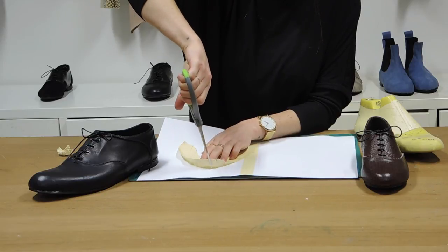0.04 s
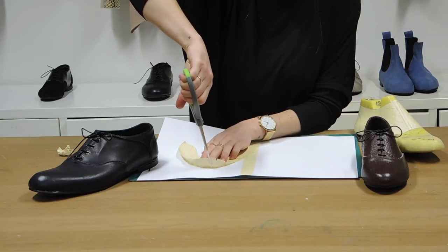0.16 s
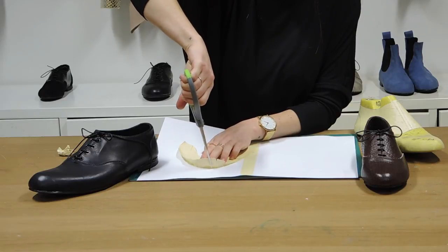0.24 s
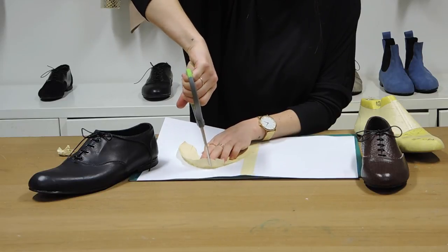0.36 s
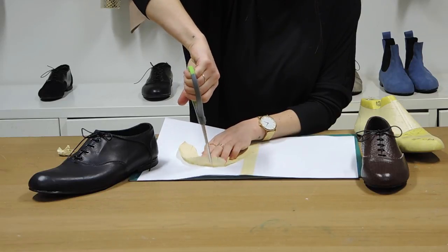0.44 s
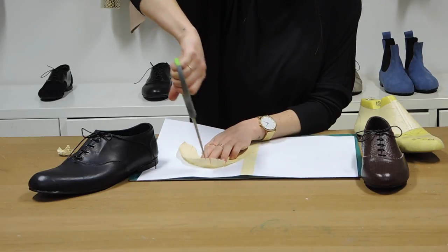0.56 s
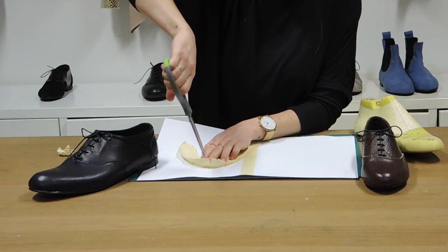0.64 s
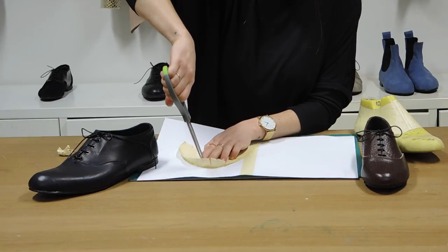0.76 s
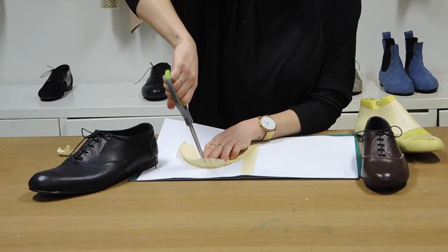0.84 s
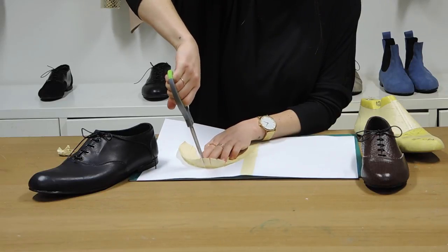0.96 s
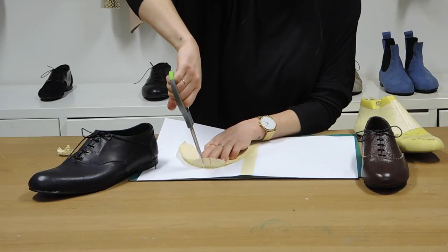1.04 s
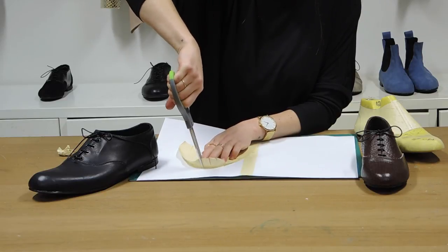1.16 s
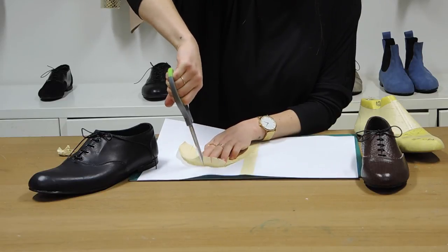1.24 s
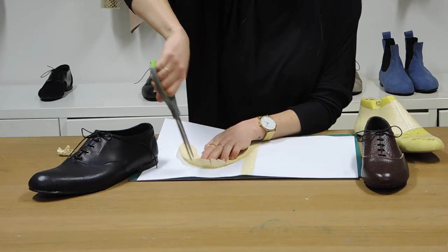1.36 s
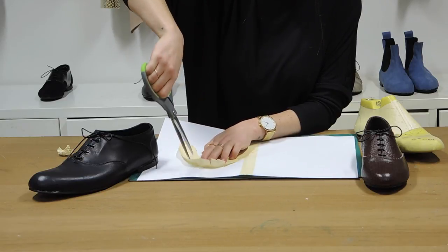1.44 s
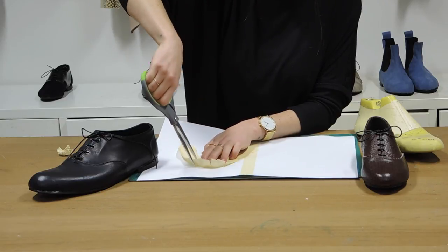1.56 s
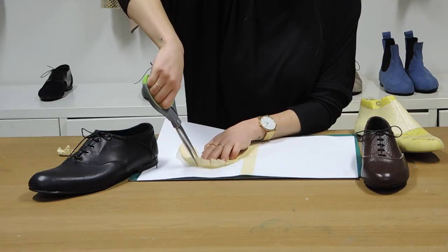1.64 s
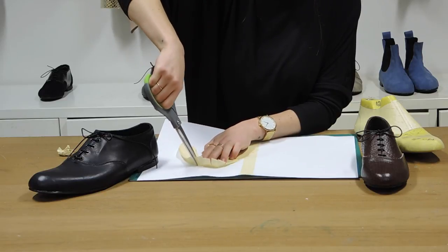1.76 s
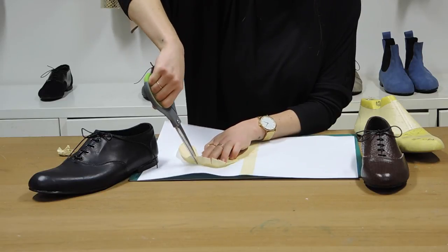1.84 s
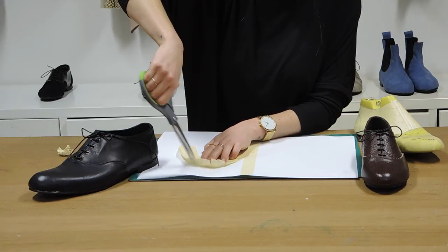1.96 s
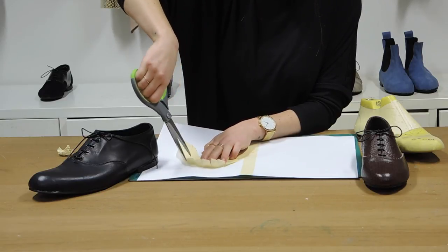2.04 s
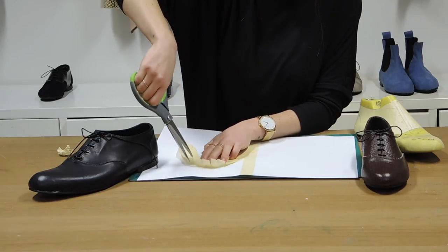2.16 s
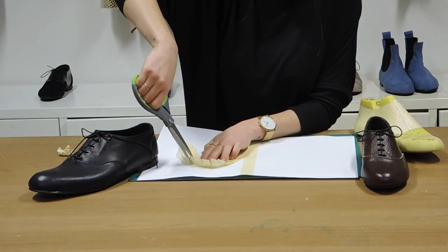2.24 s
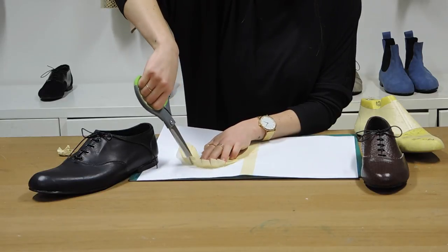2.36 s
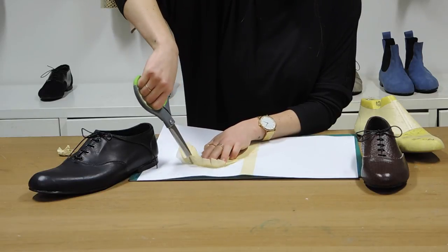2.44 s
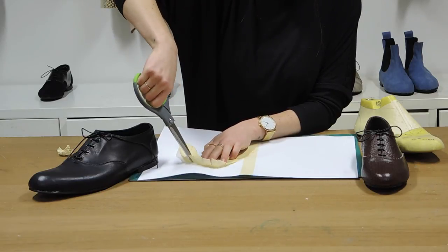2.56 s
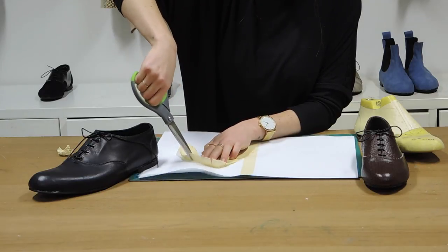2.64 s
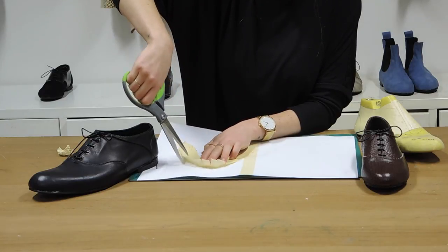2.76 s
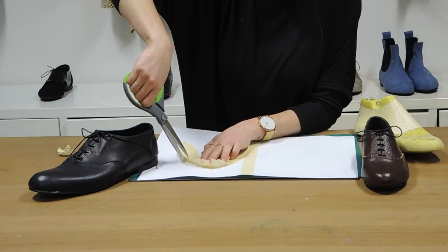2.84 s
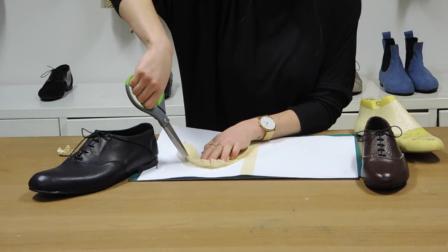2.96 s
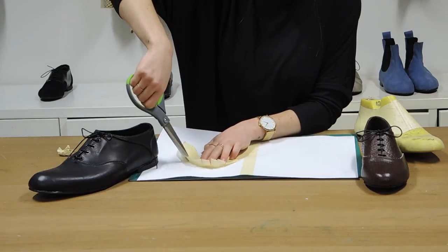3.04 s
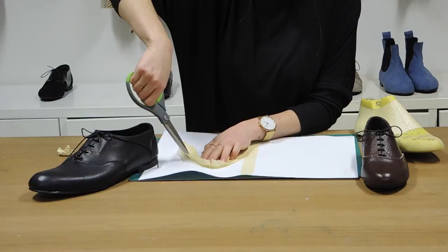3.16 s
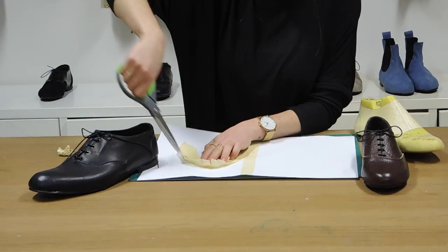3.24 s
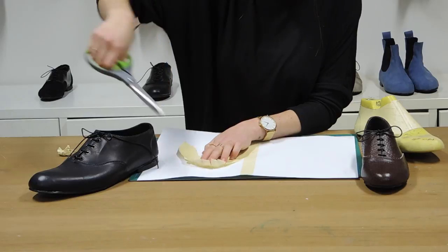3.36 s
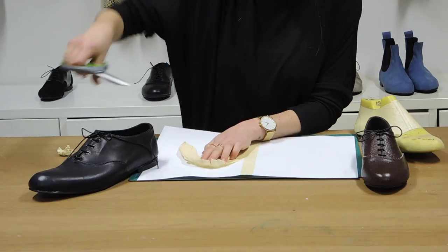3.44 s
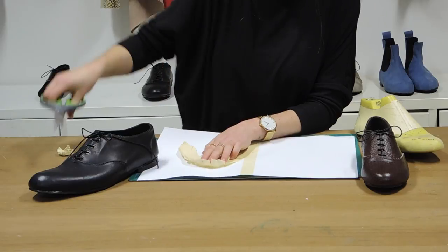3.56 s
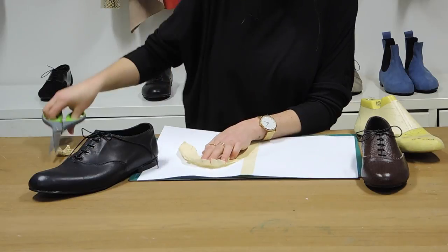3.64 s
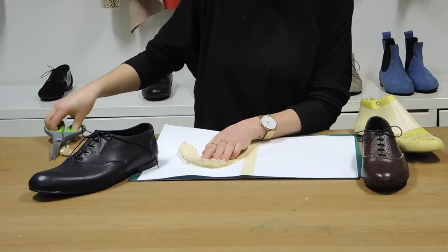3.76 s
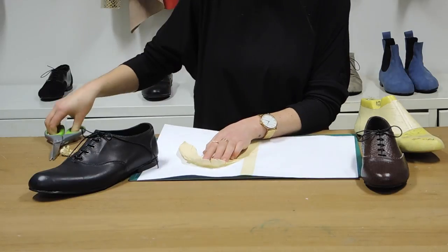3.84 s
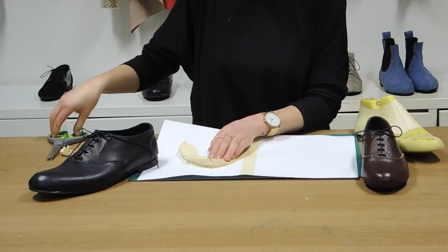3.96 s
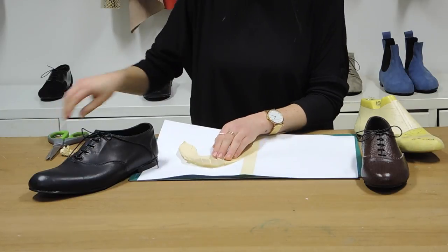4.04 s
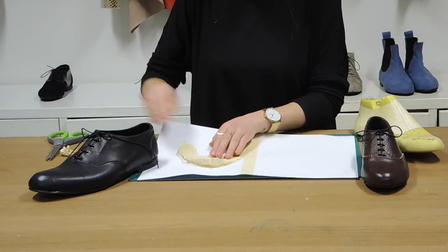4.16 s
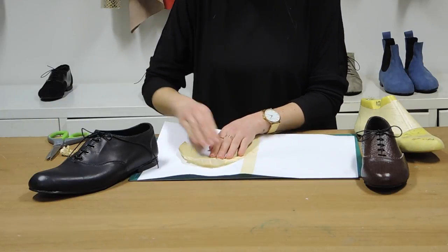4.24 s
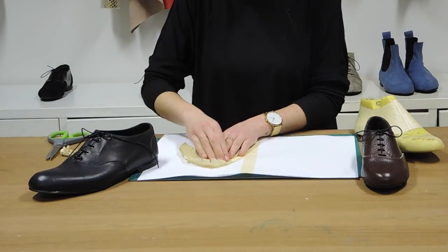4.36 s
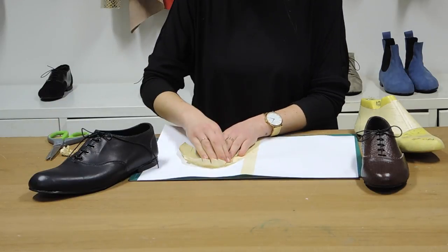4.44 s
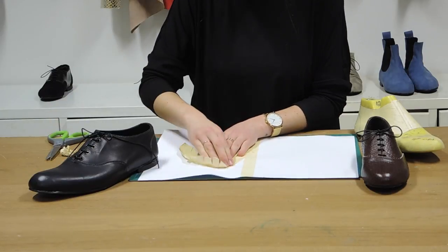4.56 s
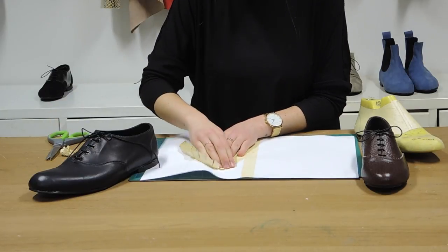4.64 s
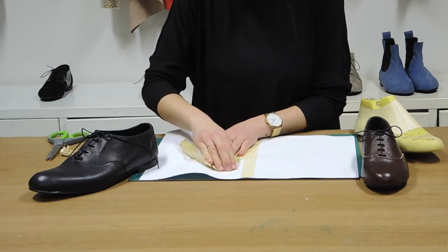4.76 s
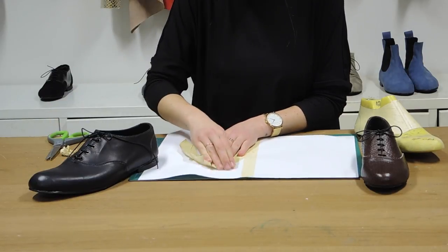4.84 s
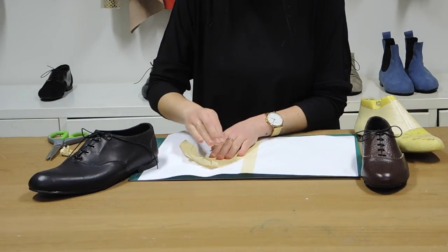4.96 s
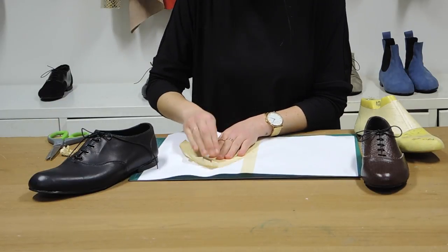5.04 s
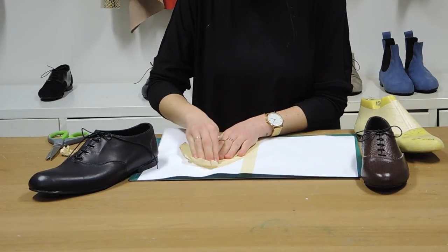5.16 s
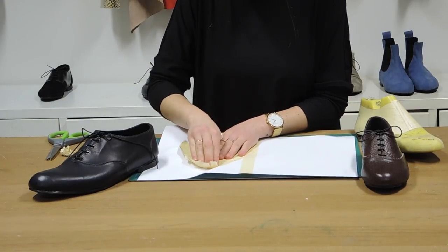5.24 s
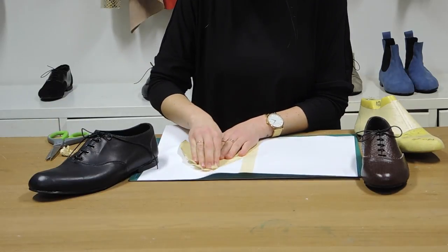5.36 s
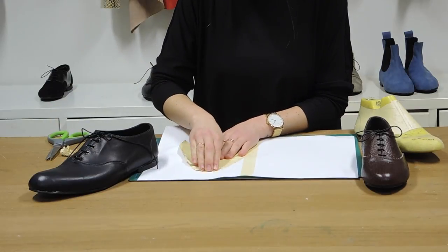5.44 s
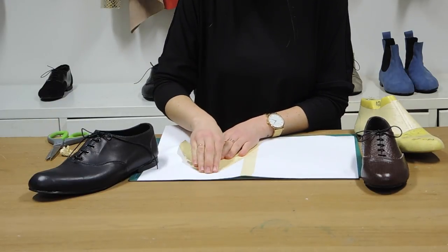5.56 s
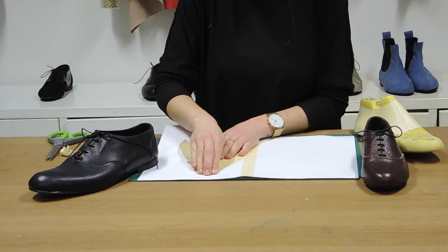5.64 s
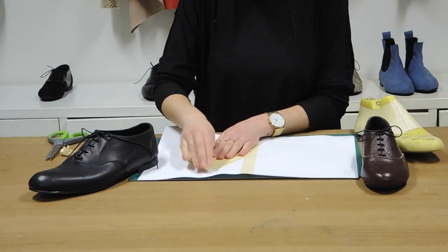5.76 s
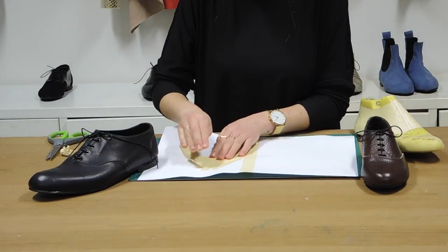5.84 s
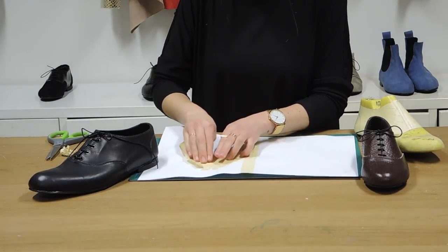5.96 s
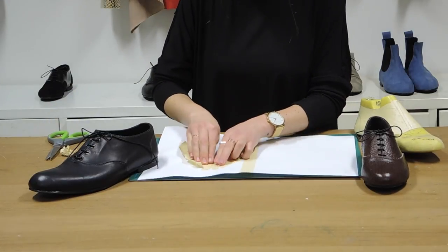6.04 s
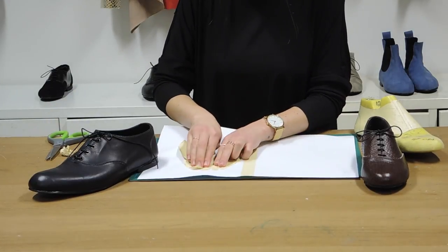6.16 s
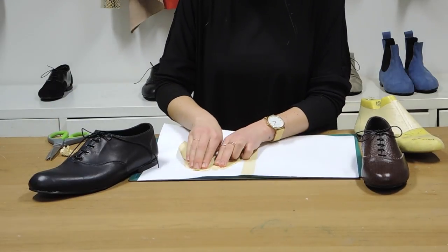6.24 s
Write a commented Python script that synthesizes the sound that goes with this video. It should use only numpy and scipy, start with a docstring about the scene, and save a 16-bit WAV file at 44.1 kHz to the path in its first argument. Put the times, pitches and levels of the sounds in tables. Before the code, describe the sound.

Scissors make about four short, crisp snips through masking tape on paper, each a thin metallic bite followed by the click of the handles. The paper scuffs and snaps in between. The scissors are then put down on a wooden table with a clack and a brief low ring. Fingers press and rub the tape, with one sharp paper snap. The room is bare and echoing, and the sound sits on the right over faint hiss.

```python
"""Masking tape on paper on a wooden table in a bare, echoing room.
The paper scuffs and snaps; scissors snip the tape: the blades bite, then shut. A far bump at 2.2 s.
Near 4 s the scissors are laid down with a clack, and two low tones linger.
Fingers then press and rub the tape, making the paper snap and the table hum.
One microphone feeds the right channel; the left has amplifier hiss, hum and a trace of leaked treble."""
import sys
import numpy as np
from scipy import signal
from scipy.fft import rfft, irfft, next_fast_len
from scipy.io import wavfile
from scipy.ndimage import map_coordinates

SR = 44100
rng = np.random.default_rng(int(sys.argv[2]) if len(sys.argv) > 2 else 0)


def dump_mix(stems):
    """Bounce the given channels to the path in sys.argv[1] as a 16-bit WAV at rate SR."""
    frames = np.atleast_2d(stems).T  # one column per channel
    limited = np.clip(frames, -1, 1)  # hard clip at full scale
    pcm = np.round(limited * 32767).astype(np.int16)
    wavfile.write(sys.argv[1], SR, pcm)


N = 277477

# resonances of the steel blades and the wooden top: f/Hz, width/Hz, level/dB
BLADE_MODES = [(3150, 190, 4), (4120, 76, 8), (5450, 140, 3), (6420, 200, 7), (7850, 130, 3),
               (10200, 270, 7), (12000, 250, 6)]
TABLE_MODES = [(129.6, 6.3, 9), (162, 4.4, 9), (213.4, 9, 8), (256, 16, 6.5), (340.2, 13.7, 12.5),
               (365.7, 11, 16), (528, 19, 11.5), (649, 75, 5), (1193, 130, 0.5), (1640, 105, 4.5),
               (1964, 97, 5), (3600, 270, 5.5), (4040, 84, 6)]


def amp(db):
    return 10 ** (np.asarray(db) / 20)


def unit_rms(x):
    return x / np.sqrt(np.mean(x ** 2) + 1e-20)


def along(points, hz):
    """Interpolate (f/Hz, value) points on a log axis."""
    f, v = np.transpose(points)
    return np.interp(np.log(hz + 1), np.log(f + 1), v)


def body(modes, peak_hz, below_db_oct, above_db_oct):
    """Gain over frequency: a broad hump carrying the object's modes."""
    def gain(f):
        octaves = np.log2((f + 20) / peak_hz)
        hump = amp(np.where(octaves < 0, abs(below_db_oct), -abs(above_db_oct)) * octaves)
        peaks = sum(amp(2 * db) / (1 + (2 * (f - hz) / width) ** 2) for hz, width, db in modes)
        return hump * np.sqrt(1 + peaks)
    return gain


def causal(gain, size):
    """Minimum-phase impulse response of gain(f)."""
    cepstrum = irfft(np.log(gain(np.fft.rfftfreq(size, 1 / SR)) + 1e-6))
    cepstrum[1:size // 2] *= 2
    cepstrum[size // 2 + 1:] = 0
    return irfft(np.exp(rfft(cepstrum)))


def filtered(x, gain):
    size = next_fast_len(N + 8192)
    return irfft(rfft(x, size) * gain(np.fft.rfftfreq(size, 1 / SR)), size)[..., :N]


def low_cut(x, hz):
    return filtered(x, lambda f: 1 / (1 + (hz / (f + 1)) ** 6))


def room():
    """First reflections, and a diffuse tail of energy 1 that dies faster in the treble."""
    decay = [(150, 0.78), (400, 0.62), (1000, 0.66), (2800, 0.57), (7000, 0.54), (14000, 0.29)]  # reverberation: f/Hz, t60/s
    echoes = [(2.5, -17), (8.6, -9), (13.5, -13), (18.5, -14), (23.5, -14), (27.5, -15)]  # nearest surfaces: delay/ms, level/dB
    size = round(.8 * SR)
    hz, t, spectra = signal.stft(rng.standard_normal(size), SR, nperseg=256)
    spectra *= amp(-60 * t / along(decay, hz)[:, None])
    tail = signal.istft(spectra, SR, nperseg=256)[1][:size]
    build_s = np.clip(np.arange(size) / SR - .008, 0, 1)
    tail *= .45 + .55 * (1 - np.exp(-build_s / .005))  # things on the table scatter first
    early = np.zeros(2048)
    for ms, db in echoes:
        early[round(ms * SR / 1000)] = amp(db + rng.normal(0, 2))
    return early, tail / np.linalg.norm(tail)


def with_tail(x, db):
    return x + amp(db) * signal.fftconvolve(x, room()[1])[:N]


def contacts(rows, modes, above_db_oct, size=4096):
    """Each contact: a sharp break and a dying crackle ring a body; the room answers."""
    reflectance = [(300, -0.2), (2000, 0.83), (5000, -2.5), (14000, -3.5)]  # surfaces: f/Hz, level/dB
    surface = causal(lambda f: amp(along(reflectance, f)), 256)
    out, t = np.zeros(N + 2 * SR), np.arange(2048) / SR
    for at_s, db, peak_hz, below_db_oct, ms, room_db in rows:
        age = t / (ms / 1000 + 1e-5)
        crackle = age * np.exp(-3 * age) * rng.standard_normal(len(t))
        crackle /= np.linalg.norm(crackle)
        lead = round(ms * SR / 3000)
        crackle[lead] += 1.6 * np.exp(-ms / 2.5)  # short contacts break in one click
        crackle /= np.linalg.norm(crackle)
        ring = causal(body(modes, peak_hz, below_db_oct, above_db_oct), size)
        ring *= amp(db) / np.linalg.norm(ring)
        direct = signal.fftconvolve(crackle, ring)
        early, tail = room()
        early *= amp(min(room_db - 3, 1))
        reflected = signal.fftconvolve(np.convolve(direct, surface), early)
        diffuse = amp(room_db) * signal.fftconvolve(np.convolve(ring, surface), tail)
        for part in direct, reflected, diffuse:
            out[round(at_s * SR) - lead:][:len(part)] += part
    return out[:N]


def grains(colour, rough_db, rate_hz):
    """Coloured noise of rms 1 with an uneven level."""
    noise = rng.standard_normal(N)
    knots = rng.standard_normal(int(N * rate_hz / SR) + 4)
    wobble = map_coordinates(knots, [np.arange(N) * rate_hz / SR])
    return unit_rms(filtered(noise * amp(rough_db * wobble), colour))


def gain_curves(rows, rise_db_s, fall_db_s):
    """One curve per row: rise, hold, fade."""
    at_s, hold_s, db = np.array(rows).T[:3, :, None]
    t = np.arange(N) / SR
    before_s = np.maximum(at_s - t, 0)
    after_s = np.maximum(t - at_s - hold_s, 0)
    return amp(db - rise_db_s * before_s - fall_db_s * after_s)


def room_air():
    """Low, slightly wavering room tone."""
    spectrum = [(25, -24), (50, -15.5), (120, 0), (170, -2), (260, -10.5), (360, -10.5), (550, -11),
                (800, -17.5), (2000, -23), (3300, -21), (6000, -40), (15000, -65)]  # air: f/Hz, relative level/dB
    return amp(-51) * grains(lambda f: amp(along(spectrum, f)), rough_db=.6, rate_hz=5)


def rustle():
    """Faint steady rustle with a few brief, soft swells of noise."""
    swells = [(.61, 0.017, -65), (3.38, 0.0093, -50), (4.94, 0.008, -49), (5.57, 0.012, -59.5),
              (6.28, .01, -54.5)]  # t/s, hold/s, level/dB
    envelope = amp(-59.5) + gain_curves(swells, rise_db_s=76, fall_db_s=240).sum(0)
    return with_tail(envelope * grains(body([], 3000, 4, 3), rough_db=3, rate_hz=40), db=-4)


def paper_contacts():
    """Soft scuffs and sharp snaps excite the sheet on its mat."""
    modes = [(2180, 770, 5), (3530, 1800, 3.5), (6770, 530, 1)]  # sheet: f/Hz, width/Hz, level/dB
    # t/s, level/dB, f/Hz, slope below/(dB/oct), length/ms, room/dB
    scuffs = [(.133, -25, 2800, 8.9, 13, -17), (.365, -25, 1970, 1.4, 15, 5), (.391, -27, 2800, 4, 7.2, 1),
              (.69, -17, 10000, 7.4, 14, 5), (1.472, -18, 9000, 7.3, 14, 4.5),
              (2.09, -14, 8000, 4.2, 13, 5), (4.375, -19.5, 2000, 4.9, 10, 5.5),
              (4.99, -14, 2700, 1.3, 19, 4), (5.376, -15.5, 4240, 3.3, 19, .4),
              (6.02, -20.5, 7150, 8.8, 16, -1), (6.27, -34, 5000, 2.1, 15, -4)]
    snaps = [(.458, -1, 4200, 5.8, 2.4, -17), (.4617, -6, 6000, 5.3, 2.1, 5.5),
             (.486, 6, 3700, 23, 1.04, -4), (.5965, -13.5, 3900, 9.7, 2.46, 8),
             (1.174, -28, 3600, 13, 10, -5), (4.7745, 7.5, 11000, 3.6, 2.2, 3),
             (5.268, -17, 2400, 3, 2.64, 8), (5.6483, -15.5, 6470, 7.8, 2.44, 3.5),
             (5.983, -38, 2520, 6, 2.3, -1)]
    return contacts(scuffs, modes, above_db_oct=6.1) + contacts(snaps, modes, above_db_oct=6.4)


def tip_thuds():
    """Blade tips press on the table."""
    thuds = [(.462, -19, 328, 1.9, 2.4, 5.1), (1.298, -25, 363, 6.5, 6.6, 8.6),
             (1.949, -20, 332, 1.5, 4.6, 2.6)]  # t/s, level/dB, f/Hz, slope below/(dB/oct), length/ms, room/dB
    return contacts(thuds, TABLE_MODES, above_db_oct=10, size=16384)


def handle_clicks():
    """The plastic grips meet as the scissors shut."""
    modes = [(1810, 49, -4.5), (2580, 490, -8.5), (4620, 480, 0.5), (6100, 330, 1)]  # grips: f/Hz, width/Hz, level/dB
    shuts = [(.6188, -6.5, 2720, 0.79, 1.05, 1.9), (1.393, -13, 3150, 4.4, 1.57, 7.5),
             (1.411, -15.5, 3340, 7, 5.7, 1.5), (1.971, -16.5, 2090, 7.3, 2.2, 2.4),
             (2.071, -13.5, 2390, 2.6, 1.83, 4), (2.779, 0.9, 2540, 5.2, 1.4, 1.6),
             (3.313, -7.5, 2190, 5.4, 2.1, 6.1), (3.335, -8.5, 3100, 5.1, 13.2, 1.1)]  # t/s, level/dB, f/Hz, slope below/(dB/oct), length/ms, room/dB
    return contacts(shuts, modes, above_db_oct=8)


def blade_bites():
    """The steel rings as it bites the tape."""
    bites = [(1.241, -15.5, 5040, 5, 19, -7), (1.255, -21, 7000, 4, 7.2, -8),
             (1.27, -9, 4170, 7, 4.8, -4.5), (1.891, -17, 6500, 21, 21, -9),
             (1.901, -16, 6450, -2.5, 3.7, 1.2), (1.9215, -4, 4100, 10.5, 3, -5.5),
             (2.585, -10, 7000, 18, 3.8, -7), (2.599, -7.5, 5960, 24, 4, -7.5),
             (3.137, -20, 6250, 2, 6.4, 7), (3.16, -22, 6800, 13, 9.7, 9), (3.17, -16.5, 5160, -4, 11, 0)]  # t/s, level/dB, f/Hz, slope below/(dB/oct), length/ms, room/dB
    return contacts(bites, BLADE_MODES, above_db_oct=20.3)


def blade_shear():
    """Sliding friction excites the blades."""
    slides = [(1.268, 0.0051, -35), (1.915, 0.009, -32.5), (2.594, 0.0052, -33.5), (3.16, .012, -40.5)]  # t/s, hold/s, level/dB
    envelope = gain_curves(slides, rise_db_s=740, fall_db_s=530).sum(0)
    friction = grains(body(BLADE_MODES, 9000, 2.8, 1.1), rough_db=3, rate_hz=440)
    return with_tail(envelope * friction, db=-4)


def far_bump():
    """One dull, distant bump."""
    bump = [(2.224, 0.0092, -39.5)]  # t/s, hold/s, level/dB
    envelope = gain_curves(bump, rise_db_s=380, fall_db_s=97).sum(0)
    rumble = grains(body([], 91, 18, 13.7), rough_db=4, rate_hz=15.9)
    return low_cut(envelope * rumble, hz=60)


def drop_clack():
    """The scissors land and ring the table top."""
    knocks = [(3.8295, -0.26, 457, 5.5, 1.7, 5.5), (4.015, 6, 960, 5, 1.9, 9.5),
              (4.0165, 7, 2460, 2.6, 3.5, -12), (4.034, 2.5, 640, 2.8, 1.43, 11),
              (4.056, 5.5, 615, 1.8, 2.8, 4), (4.075, 3, 604, 5.4, 2.43, 7)]  # t/s, level/dB, f/Hz, slope below/(dB/oct), length/ms, room/dB
    return contacts(knocks, TABLE_MODES, above_db_oct=4.06, size=16384)


def standing_waves():
    """The drop sets up two low tones that swell and linger."""
    waves = [(4.03, 170.9, -23, 88, 0.87), (4.029, 372.5, -35, 140, 0.4)]  # t/s, f/Hz, level/dB, swell/ms, t60/s
    out = np.zeros(N)
    for at_s, hz, db, swell_ms, t60_s in waves:
        t = np.maximum(np.arange(N) / SR - at_s, 0)
        swell = 1 - np.exp(-(t * 1000 / swell_ms) ** 2)
        out += amp(db - 60 * t / t60_s) * swell * np.sin(2 * np.pi * hz * t)
    return out


def finger_rub():
    """Fingers drag on the tape; friction makes the table hum."""
    drags = [(4.678, 0.0082, -42.5, -5.5), (4.775, .01, -44.5, -5), (4.84, 0.062, -35.5, -12),
             (5.381, 0.0047, -45, 2), (5.552, 0.02, -39.5, -2), (5.68, 0.093, -48.5, 5.5),
             (6.28, .01, -48.5, -9)]  # t/s, hold/s, level/dB, upper band over deep/dB
    deep = grains(body(TABLE_MODES, 314, 10.7, 28.4), rough_db=2, rate_hz=39)
    upper = grains(body(TABLE_MODES, 495, 26, 13.1), rough_db=2, rate_hz=40)
    envelopes = gain_curves(drags, rise_db_s=230, fall_db_s=270)
    upper_envelope = amp(np.array(drags)[:, -1]) @ envelopes
    return with_tail(envelopes.sum(0) * deep + upper_envelope * upper, db=-5)


def scene():
    """Everything reaches the one microphone on the right."""
    hits = paper_contacts() + tip_thuds() + handle_clicks() + blade_bites() + drop_clack()
    hits = low_cut(hits, hz=105)  # takes the deep bass out of the clicks and knocks
    beds = room_air() + rustle() + blade_shear() + far_bump() + standing_waves() + finger_rub()
    return np.array([np.zeros(N), hits + beds])


def record(dry):
    """Both inputs hiss and hum; some treble leaks to the left; the band ends in two steps."""
    spectrum = [(25, -20), (60, -8), (150, 6.5), (500, 3.5), (2000, 1.5), (6000, 1.5), (15000, 0.5)]  # amplifier hiss: f/Hz, relative level/dB
    mains = [(50, -75.5), (150, -93), (200, -90), (300, -91)]  # amplifier hum: f/Hz, level/dB
    shared, left, right = filtered(rng.standard_normal((3, N)), lambda f: amp(along(spectrum, f)))
    hiss = amp(-57) * np.array([unit_rms(left + .59 * shared), unit_rms(right + .8 * shared)])
    hum = sum(amp(db) * np.sin(2 * np.pi * hz * np.arange(N) / SR) for hz, db in mains)
    leak = amp(-40) * filtered(dry[1], lambda f: f / 10000)
    mix = dry + hiss + hum + np.array([leak, np.zeros(N)])
    edge_hz, top_hz = 14300, 15477
    return filtered(mix, lambda f: np.where(f < edge_hz, 1, amp(-36)) * (f < top_hz))


dry = scene()
out = record(dry)
dump_mix(out)
```